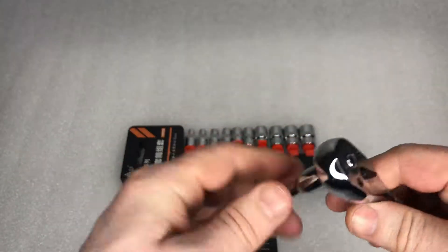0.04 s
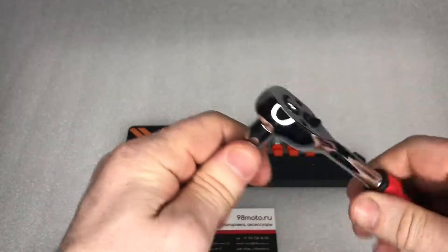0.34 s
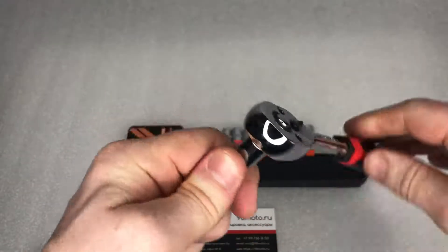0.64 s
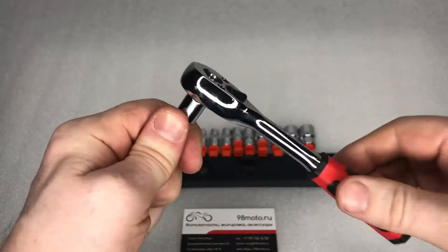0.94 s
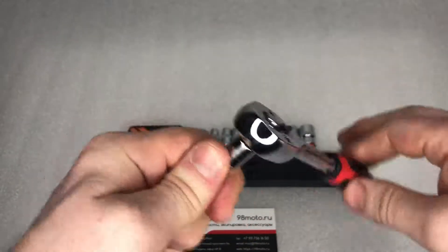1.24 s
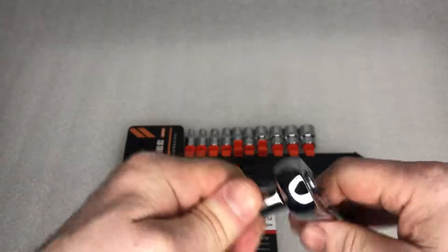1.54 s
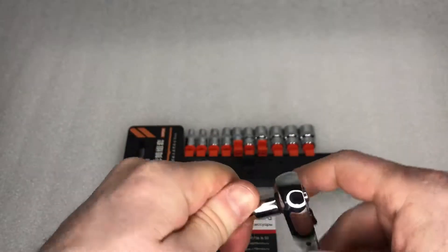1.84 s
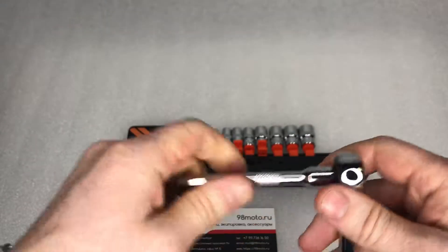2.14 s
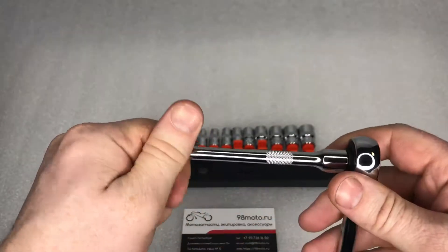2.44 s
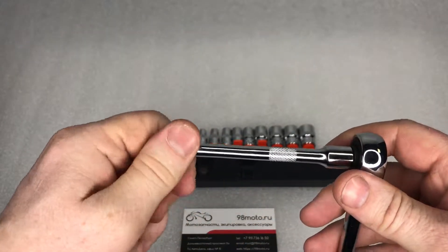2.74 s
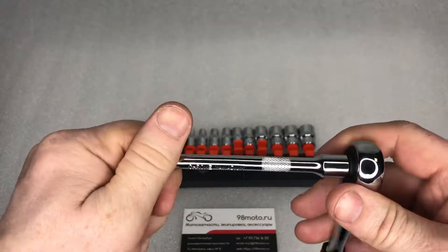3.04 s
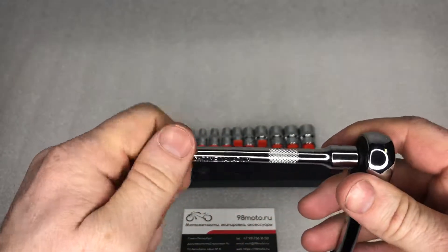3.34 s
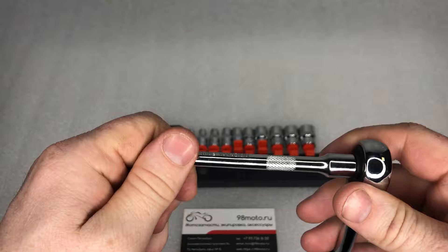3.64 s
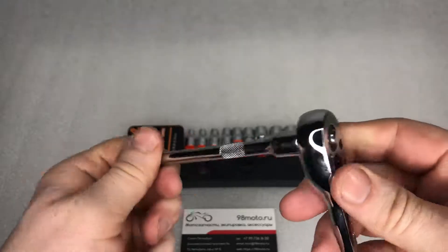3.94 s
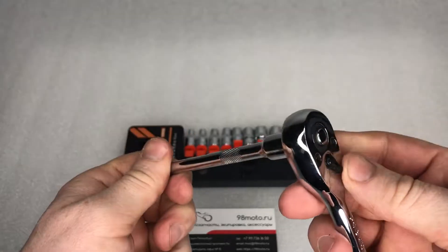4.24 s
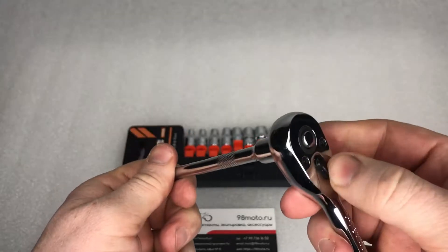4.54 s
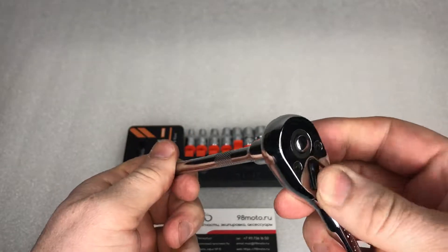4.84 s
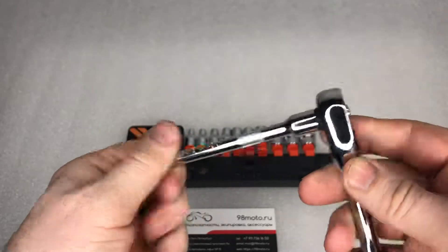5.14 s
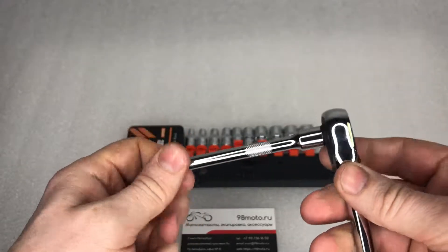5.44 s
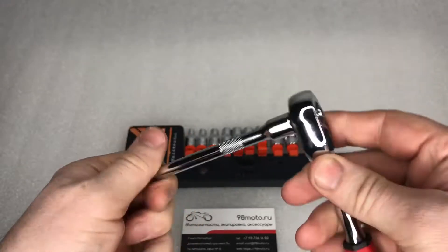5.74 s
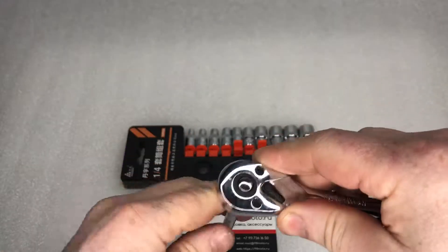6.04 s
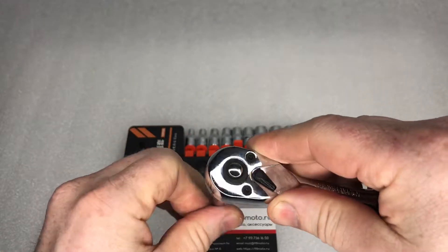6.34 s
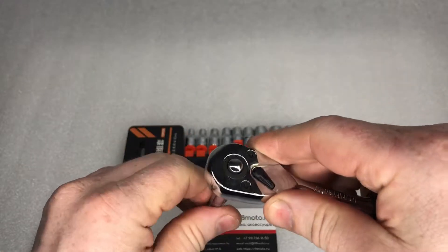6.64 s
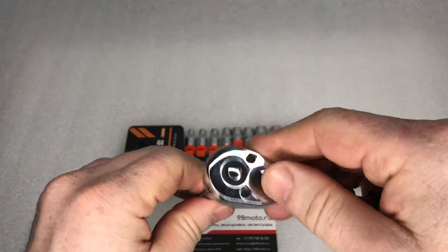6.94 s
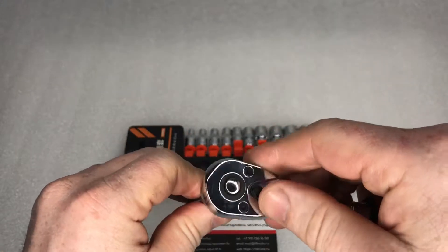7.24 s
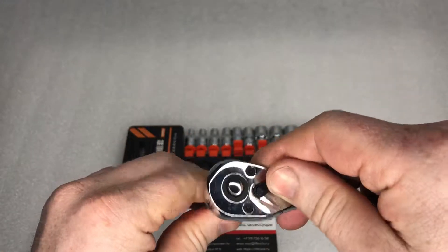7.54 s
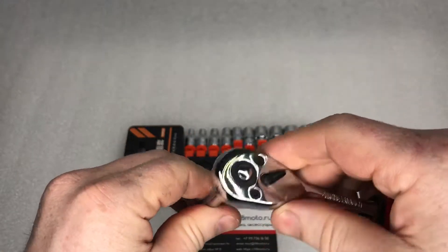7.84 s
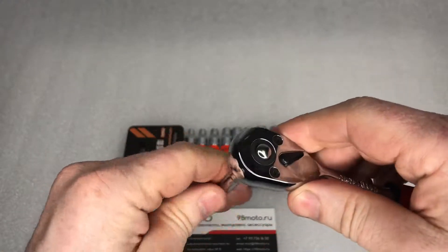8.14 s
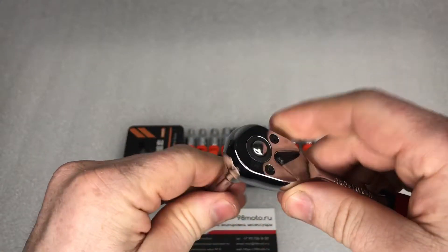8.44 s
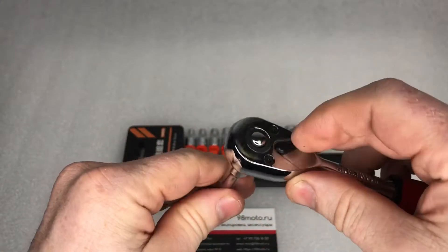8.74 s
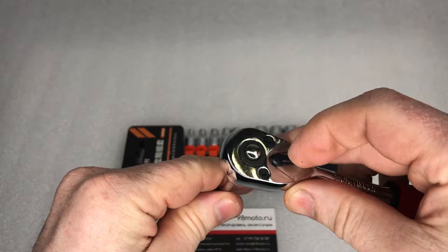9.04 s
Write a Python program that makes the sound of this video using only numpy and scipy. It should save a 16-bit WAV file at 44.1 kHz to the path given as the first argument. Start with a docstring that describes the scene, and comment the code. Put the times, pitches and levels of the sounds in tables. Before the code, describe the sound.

A small steel socket ratchet on an extension bar is swung back and forth by hand, giving about a dozen short runs of bright clicks. The faster flicks blur into a brief whirr. Between runs the loose joint ticks and fingers rub faintly on the metal. Late on, the direction lever snaps over and a few more runs follow. It is all close to the microphone, in a quiet room with a low hum.

```python
"""Short runs of bright clicks: a small steel socket ratchet on an extension bar is swung to and fro by hand.
Its pawl, a little catch, snaps over the teeth, and the clicks blur into a whirr when the handle is flicked.
Each grip damps the steel differently. Between runs the loose joint ticks, the direction lever is flipped
and fingers rub, over the low hum of a quiet room. A noise gate (an automatic volume control) lets the
hiss in with each run and turns it down a moment later."""
import sys
import numpy as np
from scipy import signal
from scipy.fft import rfft, irfft, next_fast_len
from scipy.io import wavfile
from scipy.ndimage import uniform_filter1d, map_coordinates

SR = 44100
rng = np.random.default_rng(int(sys.argv[2]) if len(sys.argv) > 2 else 0)


def persist_wave(psi):
    """Save psi, clipped to +-1, as 16-bit WAV."""
    counts = np.round(np.clip(psi, -1, 1) * 32767).astype(np.int16)
    wavfile.write(sys.argv[1], SR, np.atleast_2d(counts).T)


N = 400428


def amp(db):
    """Turn decibels into a number to multiply by."""
    return 10 ** (np.asarray(db) / 20)


def unit(x):
    """Scale a sound to an average strength (rms) of 1."""
    return x / np.sqrt(np.mean(x ** 2) + 1e-20)


def along(points, hz):
    """Read between (f/Hz, value) points, spacing the frequencies by octaves."""
    f, v = np.transpose(points)
    return np.interp(np.log(hz + 1), np.log(f + 1), v)


def wobble(rate):
    """A smooth curve through `rate` random values a second."""
    return map_coordinates(rng.standard_normal(int(N * rate / SR) + 4), [np.arange(N) * rate / SR])


def filtered(x, response):
    """Turn each frequency of x up or down by response(hz)."""
    size = next_fast_len(len(x) + SR // 4)
    return irfft(rfft(x, size) * response(np.fft.rfftfreq(size, 1 / SR)), size)[:len(x)]


def noise(colour):
    """Steady noise with a colour: a list of how strong each frequency is."""
    return unit(filtered(rng.standard_normal(N), lambda hz: amp(along(colour, hz))))


def coloured(x, colour, size=2048):
    """Colour a sound without smearing any of it ahead of its start (a minimum-phase filter)."""
    gain = amp(np.maximum(along(colour, np.fft.rfftfreq(size, 1 / SR)), -60))
    cepstrum = irfft(np.log(gain))
    cepstrum[1:size // 2] *= 2
    cepstrum[size // 2 + 1:] = 0
    kernel = irfft(np.exp(rfft(cepstrum)))
    return signal.fftconvolve(x, kernel / np.linalg.norm(kernel))[:len(x)]


def add(track, s, sound):
    """Mix a sound into the track at s seconds."""
    part = track[max(round(s * SR), 0):][:len(sound)]
    part += sound[:len(part)]


def fade(t, t60):
    """Die away from t = 0, losing 60 dB in the fade time t60."""
    return (t >= 0) * np.exp(-np.log(1000) * np.abs(t) / t60)


def ring(modes, t, spread_db=2, attack_s=.0004):
    """Struck steel rings at its own notes, each a little louder or softer every time."""
    tones = sum(amp(db + spread_db * rng.normal()) * fade(t, t60) * np.sin(2 * np.pi * hz * t)
                for hz, db, t60 in modes)
    return tones * (1 - np.exp(-t / attack_s))


def motor_tone(hz, drift_hz):
    """One motor note whose pitch wanders slightly."""
    return np.sqrt(2) * np.sin(2 * np.pi * np.cumsum(hz + drift_hz * wobble(4)) / SR)


# Colours of the room's rumble and of the hiss: f/Hz, relative level/dB
RUMBLE_COLOUR = [(10, -41.5), (24, -16), (45, -6), (64, -1), (90, -8), (130, -14), (175, -13.5),
                 (204, -11.5), (250, -18), (410, -20.5), (660, -25.5), (1000, -31), (2000, -41),
                 (4400, -100)]
HISS_COLOUR = [(470, -24), (800, -1.5), (2930, -2.5), (3670, -2), (4950, -7), (6120, -5), (10300, -8.5),
               (12800, -6.5), (15800, -10)]
# How loud the motor hums over time: t/s, level/dB
HUM_LEVELS = [(0, -63), (4.8, -65.5), (4.95, -52), (5.6, -58), (6.2, -62), (6.4, -62.5), (9.08, -78)]


def background(hum_hz=68.2, whine_hz=520, hiss_db=-63):
    """Room rumble, the hum and thin whine of a distant motor, and a faint steady hiss."""
    hum_db = np.interp(np.arange(N) / SR, *np.transpose(HUM_LEVELS))
    hum = amp(hum_db + 1.5 * wobble(6.7)) * motor_tone(hum_hz, drift_hz=.6)
    whine = amp(-76.5 + 1.3 * wobble(2.4)) * motor_tone(whine_hz, drift_hz=1.2)
    rumble = amp(-59 + .8 * wobble(9.4)) * noise(RUMBLE_COLOUR)
    return rumble + hum + whine + amp(hiss_db) * noise(HISS_COLOUR)


# Finger rubs: middle t/s, length/s, centre f/Hz, level/dB
FINGER_RUBS = [(0.375, 0.28, 13500, -54), (0.503, 0.63, 4000, -63.5), (2.229, 0.3, 2500, -60.5),
               (4.14, 0.53, 3760, -64), (7.342, .06, 1000, -55.5), (7.344, 0.069, 557, -56)]


def fingers(width_octaves=0.67):
    """Skin slides over the steel in soft swells of noise."""
    out = np.zeros(N)
    for s, length, centre_hz, db in FINGER_RUBS:
        swell = np.hanning(int(length * SR))
        band = lambda hz: np.exp(-(np.log2((hz + 1) / centre_hz) / width_octaves) ** 2)
        rub = unit(filtered(rng.standard_normal(SR), band))
        add(out, s - length / 2, amp(db) * swell * rub[:len(swell)])
    return out


# Notes of the extension bar and of the shank (the tool's stem): f/Hz, relative level/dB, fade time/s
BAR_NOTES = [(1808, -19.5, 0.048), (1735, -25.5, 0.022)]
SHANK_NOTES = [(6090, -8, 0.032), (6800, -18, 0.033)]


def bar_and_shank(t, bar_db, shank_db):
    """A knock sets both the bar and the shank ringing."""
    return amp(bar_db) * ring(BAR_NOTES, t) + amp(shank_db) * ring(SHANK_NOTES, t)


def contact(note_hz, treble_db, bar_db, shank_db, fade_s=0.018, attack_s=.0004, gain_db=-9):
    """Steel touches steel: a tiny burst of noise around one note, and a short ring."""
    t = np.arange(SR // 12) / SR
    colour = [(150, -44), (700, -25), (note_hz / 2, -10), (note_hz, 0), (note_hz * 1.8, -6),
              (9500, treble_db - 4.5), (15000, treble_db - 8)]
    shape = fade(t, fade_s) * (1 - np.exp(-t / attack_s))
    touch = coloured(shape * rng.standard_normal(len(t)), colour)
    touch /= np.std(touch[:SR // 400])
    return amp(gain_db) * (touch + bar_and_shank(t, bar_db, shank_db))


# Ticks of the loose joint: t/s, relative level/dB, note f/Hz, bar ring/dB, shank ring/dB
JOINT_TICKS = [(0.026, -39, 6800, 13.5, -18), (0.229, -39, 6340, -18, -18), (.252, -42, 5450, -10, -18),
               (0.639, -25, 2920, -20, -19), (0.654, -22, 2900, -22, -24), (0.86, -37.5, 5200, -9, -12),
               (.936, -45, 3580, -24, -20), (1.056, -38.5, 3000, 10, -14), (1.31, -40, 6170, -14, -10),
               (1.617, -28, 3100, -20, -8), (1.801, -37.5, 4060, -11, 5), (2.626, -32, 5150, -24, -14),
               (2.985, -41.5, 3870, 1, -14), (3.279, -38, 6000, -17, 13), (3.886, -41, 5400, -14, -16),
               (3.415, -32.5, 5500, -5, -6), (3.659, -37, 6100, 0, -2), (3.93, -32.5, 5700, 4, -7),
               (4.994, -50, 3030, 32, -10), (5.202, -32, 5030, -8, -16), (5.222, -32, 5950, -10, -20),
               (5.508, -34.5, 6200, 13.5, -12), (5.597, -55, 3502, 27, -12), (5.8, -37, 6100, 10, -8),
               (5.985, -43, 6397, -10, -14), (6.414, -30.5, 4540, -15, -15), (6.595, -45, 3657, -10, -18),
               (7.013, -42.5, 2980, -1, -19), (7.673, -43, 4800, -16, -13), (7.965, -39.5, 5200, 2, -20),
               (8.031, -39, 5000, -11, -18.5), (8.321, -26.5, 4730, -6, -11), (8.468, -31, 5520, -20, -18),
               (8.701, -42, 4400, -6, -22)]


def loose_joint(treble_db=-2, strays_per_s=1.2, full_treble_hz=5140, dull_db_per_octave=27.5):
    """The square drive shifts in its socket: some clear ticks, and faint stray ones at random times."""
    out, strays = np.zeros(N), []
    for _ in range(round(strays_per_s * N / SR)):
        s = rng.random() * N / SR
        db = -49 + 2 * rng.normal()
        note_hz = 5000 * 2 ** (.3 * rng.uniform(-1, 1))
        strays.append((s, db, note_hz, -12, -12))
    for s, db, note_hz, bar_db, shank_db in JOINT_TICKS + strays:
        # lower notes come from softer contacts, which have less treble
        dull_db = dull_db_per_octave * min(np.log2(note_hz / full_treble_hz), 0)
        add(out, s, amp(db) * contact(note_hz, treble_db + dull_db, bar_db, shank_db))
    return out


# The direction lever snapping over: t/s, relative level/dB
LEVER_CLICKS = [(7.406, -30.5), (7.415, -25), (7.419, -31)]


def lever():
    """The thumb flips the direction lever: a quick cluster of bright contacts."""
    out = np.zeros(N)
    for s, db in LEVER_CLICKS:
        add(out, s, amp(db) * contact(note_hz=4140, treble_db=8, bar_db=-20, shank_db=-20))
    return out


def teeth(length, first_rate, last_rate, flick_after, flick_rate, first_db, last_db, flick_db,
          flick_half_s=.018, jitter_s=.00045, spread_db=1.43, tilt_spread=0.76):
    """The pawl drops once per passing tooth, never quite alike; gives each drop's time, level and tilt."""
    t = np.arange(0, length, 1 / SR)
    flick = np.exp(-((t - flick_after) / flick_half_s) ** 2)
    rate = np.interp(t, [0, length], [first_rate, last_rate]) + flick_rate * flick
    teeth_passed = np.floor(np.cumsum(rate) / SR)
    drops = np.flatnonzero(np.diff(teeth_passed, prepend=-1))
    late, harder, brighter = rng.standard_normal((96, 3))[:len(drops)].T
    when = t[drops] + (drops > 0) * jitter_s * late
    db = np.interp(t[drops], [0, length], [first_db, last_db]) + flick_db * flick[drops]
    return list(zip(when, db + spread_db * harder, tilt_spread * brighter))


def pawl_click(t, swing_noise, colour, tilt, fade_s, snap=0.98, rebound=0.34, alike=0.75):
    """The pawl snaps down and bounces, shaking the hand-damped head at so many notes they act as noise."""
    tilted = [(hz, db + tilt * np.log2(max(hz, 2500) / 6000)) for hz, db in colour]
    bounce_s = .0008 + .0014 * rng.random()
    shape = fade(t, fade_s) + snap * fade(t, 0.004) + rebound * fade(t - bounce_s, 0.018)
    shaking = np.sqrt(alike) * swing_noise + np.sqrt(1 - alike) * rng.standard_normal(len(t))
    click = coloured(shape * shaking, tilted)
    return click / np.std(click[:SR // 400])


# Click colour for each way of holding the tool, and after the lever flip: f/Hz, relative level/dB
BY_SOCKET = [(150, -59), (700, -27.5), (1300, -26.5), (2150, -20), (2900, -7.5), (4000, -3.5), (4900, -6.5),
             (6000, 0.5), (6850, 5.5), (7700, -8.5), (9200, 3), (10500, -3.5), (13500, 3.5), (15800, -3.5)]
BY_BAR_END = [(150, -52), (700, -37), (1200, -26), (1750, -18), (2300, -19.5), (3300, -13.5), (3900, -7.5),
              (4800, -10), (5500, -1.5), (7000, 0.5), (7800, -7.5), (9500, 2.5), (11300, -9), (14500, -5)]
BY_FINGERTIPS = [(150, -48.5), (700, -34), (1300, -41), (1900, -8.5), (2600, -20.5), (3800, -8),
                 (4700, -9.5), (5500, -1.5), (6900, -0.5), (7900, -10.5), (9300, 3.5), (10500, -1),
                 (12700, 5), (15800, -2.5)]
BY_HEAD = [(100, -33), (300, -26), (800, -28), (2000, -24.5), (2800, -18), (3500, -12), (4600, -13),
           (6200, -5.5), (7800, -16), (9500, -3), (10500, -10.5), (11900, 7), (13000, 1.5), (15800, -10)]
LEVER_FLIPPED = [(100, -29), (300, -22.5), (800, -30), (2000, -18), (2800, -11), (3700, -6.5), (4600, -10),
                 (6000, -4.5), (6900, 2.5), (7700, -10.5), (9300, -0.5), (12000, 2), (13600, 2.5),
                 (15800, -4.5)]
# Notes of the ratchet's head: f/Hz, relative level/dB, fade time/s
HEAD_NOTES = [(8900, -12.5, 0.049), (9265, -16.5, .04), (9360, -16, 0.031), (11840, -17.5, .04),
              (12130, -19.5, 0.054), (13100, -17.5, 0.027)]
# Swings of the handle. Speed and level slide from first to last; a flick of the wrist adds to them.
# t/s, length/s, first and last speed/(teeth/s), flick delay/s, flick's extra speed/(teeth/s),
# first and last relative level/dB, flick's extra level/dB, click colour, treble tilt/(dB/octave),
# bar ring/dB, shank ring/dB, head ring/dB, click fade time/s
HANDLE_SWINGS = [(0.6389, .1, 83, 39, .064, 33, -14, -14, -3, BY_SOCKET, .6, -7, -13, -8.5, .014),
                 (1.0944, .108, 79, 40, .047, 22, -13, -14, -1, BY_SOCKET, 1, -1.5, -2, -10, .015),
                 (1.6071, .124, 123, 31, .093, 16, -13, -14, 0, BY_SOCKET, -.3, -6, -1, -9, .018),
                 (2.4075, .13, 182, 70, .021, 455, -11.5, -18.5, 2, BY_BAR_END, -.3, -4, -23, -4.5, .013),
                 (3.0099, .131, 221, 98, .079, 135, -8.5, -14, 0, BY_BAR_END, .5, -8, -2.5, -3, .011),
                 (3.451, .074, 90, 94, .01, 100, -13, -12.5, 1.5, BY_BAR_END, 1, -10.5, 2, -8, .013),
                 (3.5388, .042, 118, 86, 0, 0, -12, -12, 0, BY_BAR_END, 0, -10.5, 2, -8, .013),
                 (4.7652, .005, 50, 50, 0, 0, -13.5, -13.5, 0, BY_HEAD, -1, -20.5, -15, -14.5, .0088),
                 (5.2274, .102, 326, 191, .032, 210, -10, -10.5, 0, BY_FINGERTIPS, -.2, -.5, -12, -6.5, .0094),
                 (5.8302, .069, 138, 78, .048, 563, -3.5, -12.5, 0, BY_FINGERTIPS, -.1, -2, -7, -8, .014),
                 (6.2485, .138, 136, 159, .067, 288, -10.5, -10.5, 1, BY_HEAD, -.3, -18.5, -5, -13, .015),
                 (8.049, .005, 50, 50, 0, 0, -11.5, -11.5, 0, LEVER_FLIPPED, -1.5, -21, -8, -3.5, .02),
                 (8.0675, .158, 112, 150, .104, 115, -11.5, -12, 1.5, LEVER_FLIPPED, -.6, -21, -6, -5, .018),
                 (8.4773, .037, 134, 101, 0, 0, -10.5, -12, 0, LEVER_FLIPPED, -1.5, -32, -29, -17, .021),
                 (8.526, .023, 135, 165, 0, 0, -8, -10, 0, LEVER_FLIPPED, 0, -32, -29, -17, .021),
                 (8.5595, .041, 90, 70, .005, 95, -9, -13.5, 2.5, LEVER_FLIPPED, 1.5, -32, -29, -17, .021)]


def ratchet(gain_db=-10, scrape_db=-39, fall_s=.0009):
    """Each swing drags the pawl over the teeth; every tooth clicks and leaves the steel ringing."""
    out, t = np.zeros(N), np.arange(SR // 12) / SR
    for start, *motion, colour, swing_tilt, bar_db, shank_db, head_db, fade_s in HANDLE_SWINGS:
        swing_noise = rng.standard_normal(len(t))  # clicks within one swing sound alike
        run = teeth(*motion)
        for s, db, tilt in run:
            click = pawl_click(t, swing_noise, colour, swing_tilt + tilt, fade_s)
            steel = bar_and_shank(t, bar_db, shank_db) + amp(head_db) * ring(HEAD_NOTES, t)
            add(out, start + s + fall_s, amp(db + gain_db) * (click + steel))
        # before the first drop the pawl scrapes up the side of its tooth
        climb = np.linspace(0, 1, SR // 80) ** 2
        scrape = coloured(climb * rng.standard_normal(len(climb)), colour)
        first_tooth_db = run[0][1]
        add(out, start - len(climb) / SR, amp(first_tooth_db + scrape_db) * scrape)
    return out


# How long the room's echo lasts: f/Hz, fade time/s
ECHO_TIMES = [(300, .25), (3000, 0.24), (14000, 0.064)]


def room_echo(x, delay_s=0.0053):
    """A short wash of echo, treble dying first; it changes from swing to swing as the hands move."""
    out = np.zeros(N)
    edges = [0] + [round(swing[0] * SR) for swing in HANDLE_SWINGS] + [N]
    for start, end in zip(edges, edges[1:]):
        hz, t, bands = signal.stft(rng.standard_normal(16384), SR, nperseg=256)
        tail = signal.istft(bands * fade(t, along(ECHO_TIMES, hz)[:, None]), SR, nperseg=256)[1]
        add(out, start / SR + delay_s, signal.fftconvolve(x[start:end], tail / np.linalg.norm(tail)))
    return out


def noise_gate(x, open_db=-29, hold_s=0.404, first_shut_s=0.277, quiet_db=-46.5, depth_db=-8.5,
               bass_hz=620, window=128):
    """The gate starts open and loud clicks hold it open; once shut, it lowers quiet sound above the bass."""
    upper = filtered(x, lambda hz: 1 - 1 / (1 + (hz / bass_hz) ** 4))
    level = np.sqrt(np.abs(uniform_filter1d(upper ** 2, window)))
    t = np.arange(N) / SR
    shuts_at = np.maximum.accumulate(np.where(level > amp(open_db), t + hold_s, first_shut_s))
    shut_gain = np.clip(level / amp(quiet_db), amp(depth_db), 1)
    gain = np.where(t < shuts_at, 1, shut_gain)
    return x - (1 - uniform_filter1d(gain, window)) * upper


def scene():
    """The quiet room, the tool close up and its faint echo."""
    quiet_room = background()
    tool = fingers() + ratchet() + lever() + loose_joint()
    return (quiet_room + tool + amp(-21.5) * room_echo(tool))[None]


def record(dry):
    """The recorder gates its hiss and cuts off the very highest treble."""
    top_hz = 15900
    return filtered(noise_gate(dry[0]), lambda hz: 1 / np.sqrt(1 + (hz / top_hz) ** 300))[None]


dry = scene()
out = record(dry)
persist_wave(out)
```